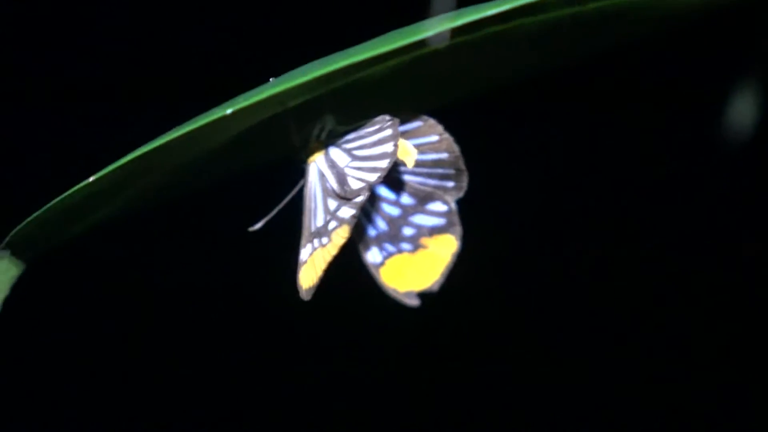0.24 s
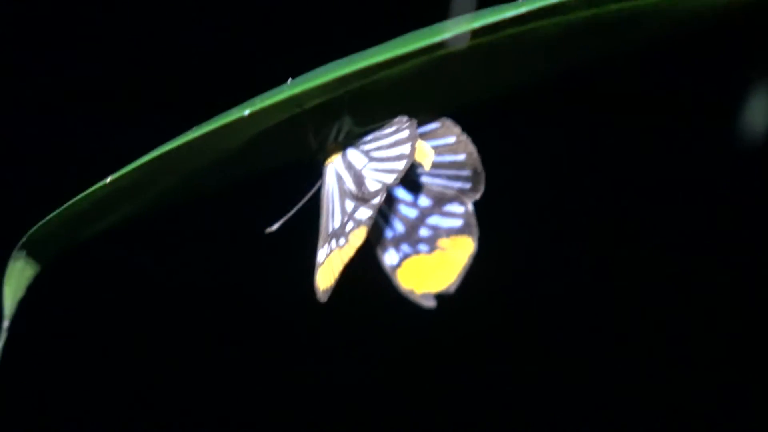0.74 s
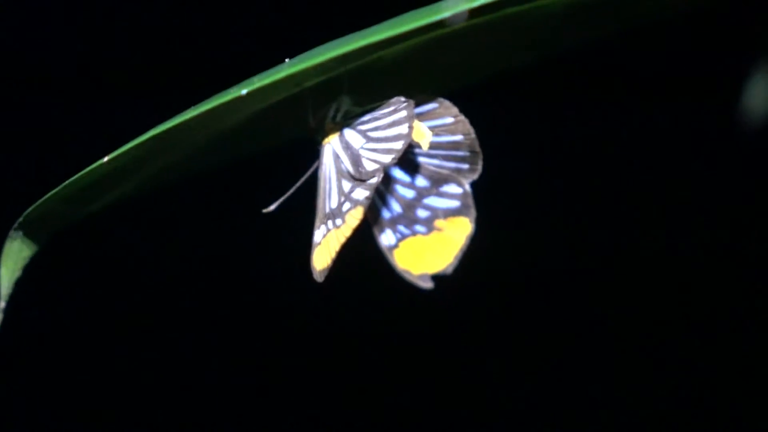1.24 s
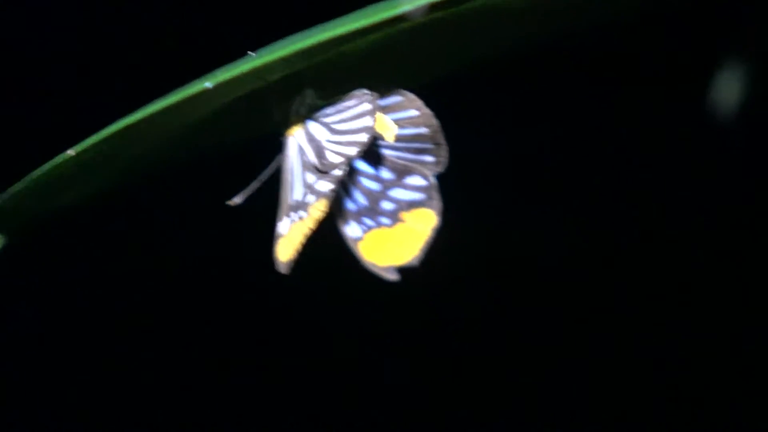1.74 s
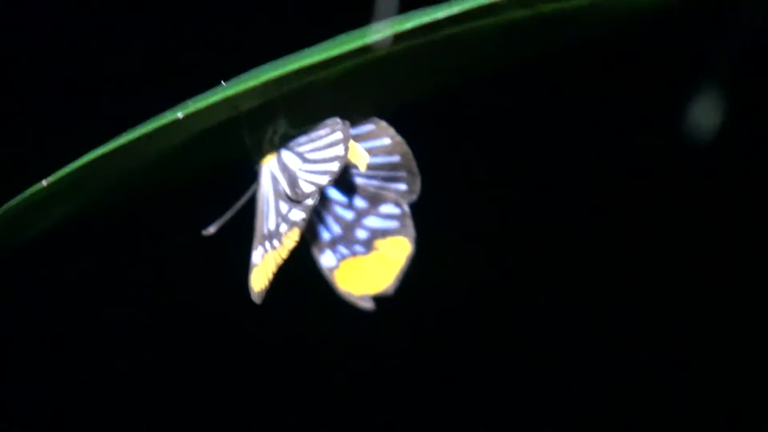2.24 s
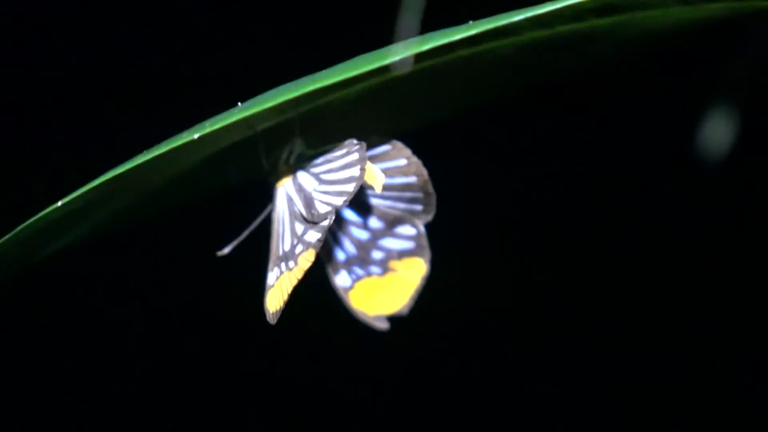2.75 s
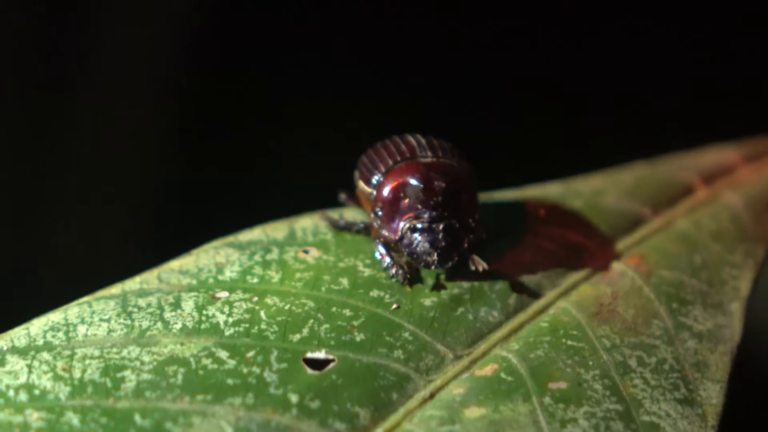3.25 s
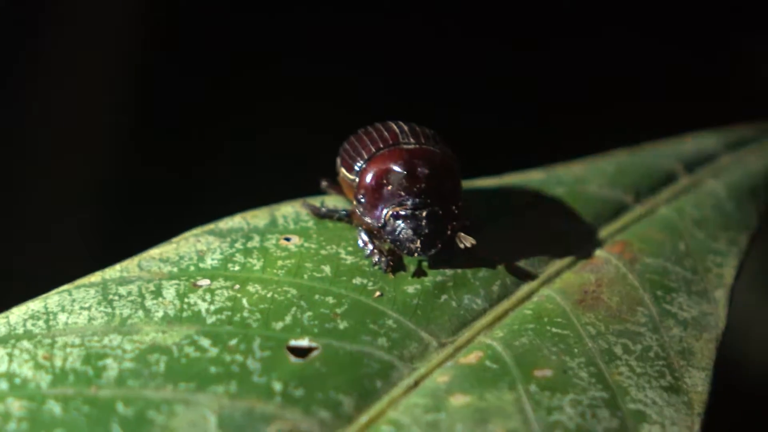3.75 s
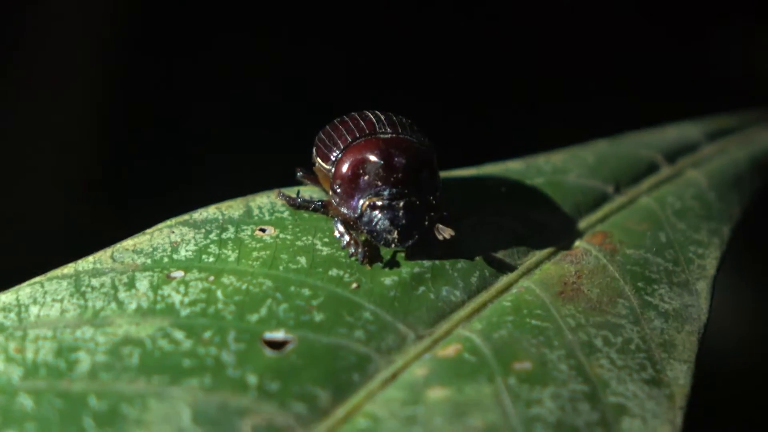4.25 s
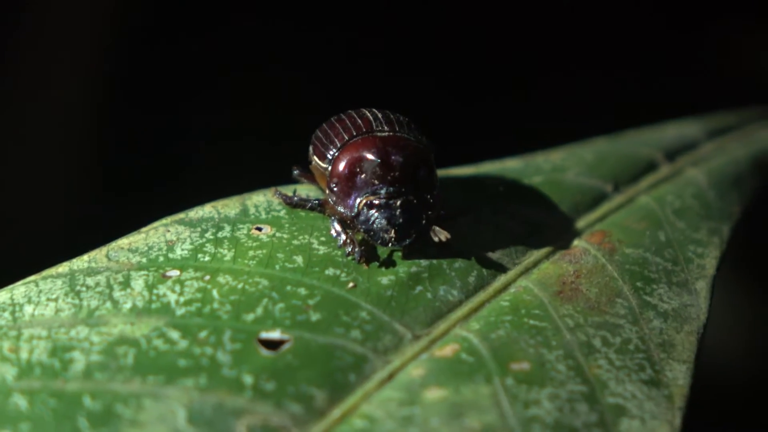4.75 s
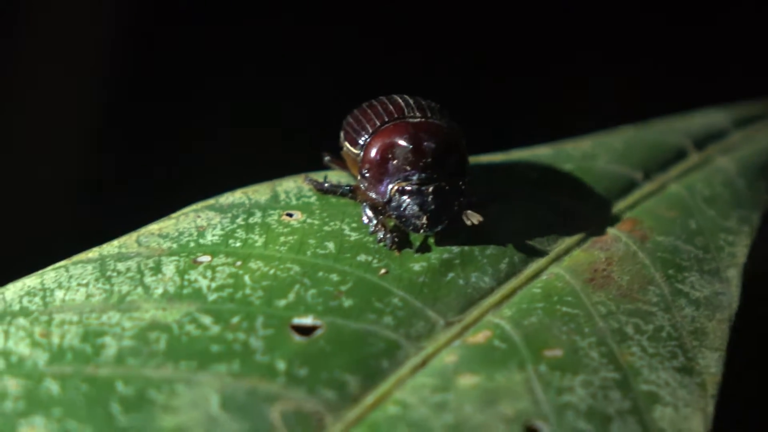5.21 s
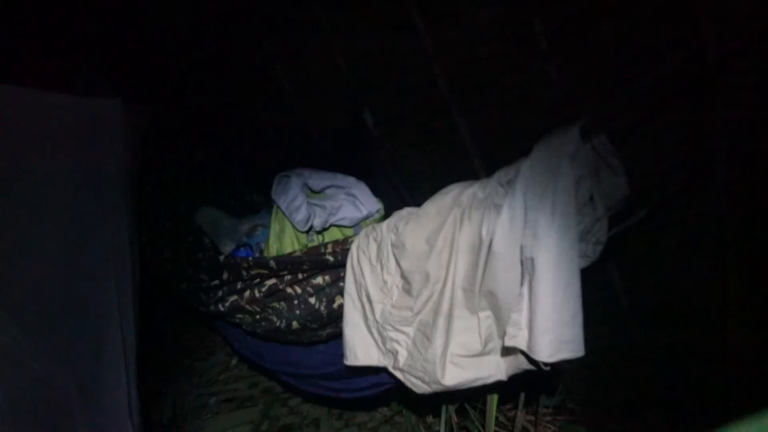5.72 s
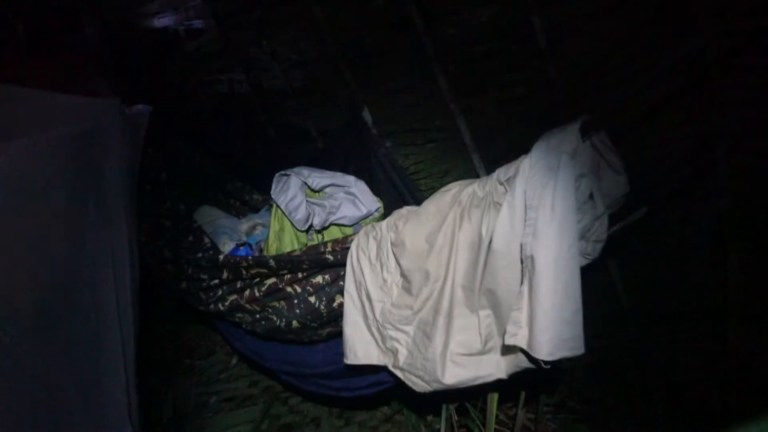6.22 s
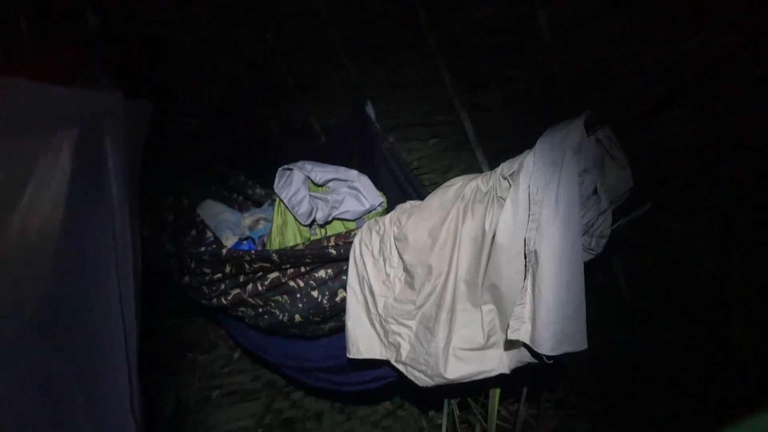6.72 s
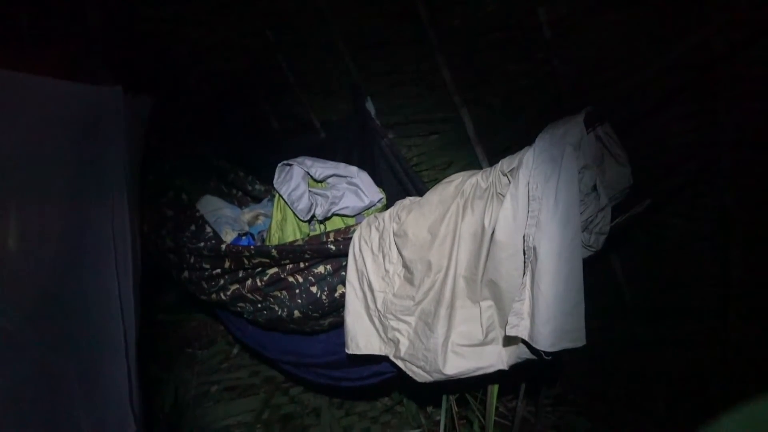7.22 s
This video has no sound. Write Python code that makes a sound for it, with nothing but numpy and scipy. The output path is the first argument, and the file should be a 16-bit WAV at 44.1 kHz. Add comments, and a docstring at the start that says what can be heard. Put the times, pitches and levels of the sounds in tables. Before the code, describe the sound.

Distant crickets hum high and steady throughout, over the hush of a night rainforest and a light, low wind rumble on the microphone. Frogs call with an echo off the trees: short peeps are scattered all along, and brief rising whoops stand out at about 1.5, 1.8, 3.4 and 6.9 seconds. Rows of falling notes come at 0.3 to 0.8 seconds, then faster at 3.5 to 4 and 6.3 to 6.8. Faint piping comes and goes. Very high katydid trills recur, more often in the second half, and a bush-cricket on the left chirps in an even, growing row from 1.8 to 4 seconds. Soft, dull knocks sound near the microphone between 3.5 and 4.1 seconds and again at 7.2. Drips tap leaves here and there, clearer at 4.9 and 6.4 seconds, with one sharp, much louder drop at 5.8.

```python
"""Far crickets hum in a few bands over the hush of a night rainforest; a breeze rumbles on two mic ports.
Frogs toot, whoop upward with a pulsing vocal sac, slide downward, peep and croak; a soft piping comes
and goes. Katydids trill high up with quick wing strokes, and a bush-cricket chirps in a growing row.
Drips tap leaves and soft knocks sound near the mic. The trunks scatter each call back as an echo."""
import sys
import numpy as np
from scipy import signal
from scipy.fft import rfft, irfft, next_fast_len
from scipy.io import wavfile
from scipy.ndimage import map_coordinates

SR = 44100
rng = np.random.default_rng(int(sys.argv[2]) if len(sys.argv) > 2 else 0)


def wav_out(sig):
    """Save sig, one row per channel (or a flat mono array), as 16-bit PCM at SR to the path in sys.argv[1]."""
    wavfile.write(sys.argv[1], SR, np.round(np.clip(np.atleast_2d(sig).T, -1, 1) * 32767).astype(np.int16))


N = 329418

# far cricket crowds (pitch [Hz], spread [Hz], level [dB])
CRICKET_CROWDS = [(4466, 180, -45.5), (5527, 230, -31.5), (5446, 500, -43), (6240, 74, -48.5),
                  (6535, 56, -47), (7225, 240, -47), (10504, 290, -50)]
# forest hush spectrum (frequency [Hz], relative density [dB])
HUSH_SPECTRUM = [(100, 8.5), (200, 4.5), (500, -2.5), (2000, -9), (3000, -8), (4200, -8.5), (6000, -38),
                 (8000, -10), (9200, -15.5), (12000, -18), (16000, -23),]
# breeze strength (time [s], level [dB])
BREEZE_LEVELS = [(0, -30), (1.1, -35), (1.7, -30), (2.6, -31), (3.6, -26.5), (4.8, -33), (6, -30),
                 (6.7, -30.5), (7.3, -29.5)]
# wind on the ports (frequency [Hz], relative density [dB])
RUMBLE_SPECTRUM = [(20, 3), (45, 0), (87, -15.5), (200, -31.5), (500, -32.5), (900, -120)]
# faint frog toots (time [s], level [dB])
FROG_TOOTS = [(.04, -51.5), (.49, -50), (4.15, -49.5)]
# whoops (time [s], level [dB], pan [dB], right lag [ms], glide start [Hz], glide end [Hz], octave [dB])
FROG_WHOOPS = [(0.138, -53.5, 2.5, 0, 2270, 2665, 7.5), (.594, -51.5, 3, 0, 2243, 2584, 2),
               (1.026, -52.5, 1.5, 0, 2177, 2544, 6.5), (1.458, -27.5, 14, .385, 2190, 2828, 1.5),
               (1.763, -31, 3, -.16, 2225, 2594, 8), (2.601, -55.5, 3, 0, 2155, 2466, 3),
               (3.398, -22.5, 3, .227, 2327, 2780, 1.5), (3.617, -40, 7, .227, 2228, 2600, 2),
               (4.27, -54, 1, 0, 2220, 2616, 9.5), (5.489, -48, 3, 0, 2230, 2625, 6),
               (6.165, -52, -1, 0, 2225, 2620, 8.5), (6.883, -31.5, 5, .204, 2183, 2650, 7.5),
               (7.222, -46.5, 5, 0, 2276, 2660, 5)]
# whooping throat's response (frequency [Hz], gain [dB])
THROAT_RESPONSE = [(2000, 4), (2400, 9), (3000, 3), (4100, 3), (4700, 8.5), (5400, 9.5), (6500, -11),
                   (7800, -7), (9000, -23), (12500, -22)]
# trills (last stroke [s], level [dB], pan [dB])
KATYDID_TRILLS = [(.47, -43, 7), (1.269, -38.5, 10), (2.04, -48.5, 30), (2.842, -52.5, 30),
                  (3.624, -41, 18), (4.412, -41, 16.5), (4.85, -42, 3.5), (5.178, -42, 20.5),
                  (5.61, -43, -1.5), (5.97, -39, 17), (6.384, -38.5, -0.5), (6.736, -39.5, 15),
                  (7.12, -37, -3), (7.5, -40, 21)]
# rows of slides (first [s], last [s], gap [s], start [Hz], end [Hz], level [dB], fade [dB], echo [dB])
SLIDE_ROWS = [(0.327, 0.754, .144, 4150, 3858, -26, -1, 2.5),
              (3.521, 4.048, 0.072, 4140, 3750, -28.5, -1.5, 4),
              (6.303, 6.795, .05, 4040, 3743, -31, -5, 5)]
# piped notes (time [s], length [s], level [dB], pitch [Hz])
PIPED_NOTES = [(0.362, 0.2, -40, 3208), (1.647, 0.12, -44.5, 3325), (2.413, 0.21, -48, 3410),
               (4.007, 0.29, -46, 3351), (4.501, 0.013, -35, 2410), (4.732, 0.02, -41, 1634),
               (5.04, 0.12, -48.5, 3400), (7.205, 0.2, -50, 3420)]
# drips on leaves (time [s], level [dB], crackle [dB], leaf pitch [Hz])
LEAF_DRIPS = [(.5317, -31, -8, 3400), (0.819, -35, -2, 1300), (.834, -28.5, 1, 1860),
              (1.081, -27, -6, 2230), (2.074, -28.5, -0.5, 2210), (3.6789, -27.5, -3, 800),
              (4.908, -16.5, 1, 2960), (5.8243, 2.5, -12, 4100), (6.148, -27, -3.5, 1840),
              (6.355, -17, 1.5, 4130), (6.7524, -23, -4, 8990)]
# peeps (time [s], level [dB], pitch [Hz], pan [dB])
FROG_PEEPS = [(1.375, -34, 4300, -2), (2.126, -28, 4585, 3), (2.292, -33.5, 4455, -0.5),
              (2.522, -29.5, 4554, 7), (2.645, -30, 3427, 13), (2.925, -31.5, 4357, 9),
              (3.184, -23.5, 4390, 8), (3.223, -20.5, 4330, 8), (3.91, -32, 4555, 11.5),
              (3.988, -23.5, 4590, 9), (5.148, -34.5, 4300, -10), (5.23, -27, 4780, 11),
              (5.851, -26.5, 3426, -2), (5.963, -31.5, 4456, 5), (6.309, -24, 4540, 10),
              (7.0, -17.5, 4364, 1), (7.382, -25.5, 4370, -8)]
# far croaks (time [s], level before echo gain [dB])
FROG_CROAKS = [(1.387, -78), (1.955, -75), (5.32, -72)]
# knocks near the mic (time [s], level [dB], pan [dB], pitch [Hz])
SOFT_KNOCKS = [(1.734, -36, 11, 312), (3.473, -25.5, -23, 302), (3.676, -24.5, 3, 195),
               (3.947, -20, -2, 575), (3.969, -19.5, -2.5, 430), (4.08, -24, -2, 364),
               (4.908, -27.5, 5, 400), (7.23, -28, -24, 300), (7.249, -23.5, -22, 168)]
# bush-cricket row (first [s], last [s], gap [s])
CHIRP_ROW = (1.833, 3.988, .1347)


def amp(db):
    return 10 ** (np.asarray(db) / 20)


def unit_rms(x):
    return x / np.sqrt(np.mean(x ** 2) + 1e-20)


def clock(length_s):
    return np.arange(int(length_s * SR)) / SR


def db_at(spectrum, hz):
    knots_hz, knots_db = np.transpose(spectrum)
    return np.interp(np.log(hz + 1), np.log(knots_hz), knots_db)


def wobble(rate_hz):
    """Smooth random curve."""
    knots = rng.standard_normal(int(N * rate_hz / SR) + 4)
    return map_coordinates(knots, [np.arange(N) * rate_hz / SR])


def lowpass(x, hz):
    return signal.sosfilt(signal.butter(2, min(hz, 20000), fs=SR, output="sos"), x)


def filtered(x, response):
    size = next_fast_len(N + 8192)
    return irfft(rfft(x, size) * response(np.fft.rfftfreq(size, 1 / SR)), size)[..., :N]


def stereo_noise(spectrum):
    return unit_rms(filtered(rng.standard_normal((2, N)), lambda hz: amp(db_at(spectrum, hz))))


def swell(t, rise_s):
    """Note envelope: quick rise, rounded end."""
    return (1 - np.exp(-t / rise_s)) * np.sqrt(np.clip(1 - (t / t[-1]) ** 2, 0, 1))


def rough_phase(t, hz, jitter, band_hz):
    """Phase of a tone with unsteady pitch."""
    return np.cumsum(2 * np.pi * hz / SR + lowpass(rng.normal(0, jitter, len(t)), band_hz))


def distance_echo_db(db, even_db):
    """Echo gain: a fainter caller is farther off, so more of it arrives as echo."""
    return 0.53 * (even_db - db)


def place(out, start_s, wave, db, pan_db, echo_db, tail_s, lag_ms=0):
    """Add a sound and its echo off the trunks. Positive pan is left; positive lag delays the right."""
    t = clock(tail_s)
    far = np.clip(echo_db / 18, 0, 1)  # far echoes gather slowly and linger
    response = rng.standard_normal((2, len(t))) * amp(-60 * t / tail_s / (1 + 0.95 * far))
    response *= 1 - np.exp(-t / (0.001 + 0.025 * far))
    response *= 1 + 0.8 * (1 - far) * np.exp(-t / 0.03)  # trunks beside a near caller
    response *= amp(echo_db + far * pan_db / 2 * np.array([[1], [-1]])) / np.linalg.norm(response[0])
    lag = round(lag_ms * SR / 1000)
    response[0, max(-lag, 0)] = (1 - far) * amp(pan_db / 2)  # direct path
    response[1, max(lag, 0)] = (1 - far) * amp(-pan_db / 2)
    heard = amp(db) * signal.fftconvolve(wave[None], response, axes=1)
    start = round(start_s * SR)
    out[:, start:start + heard.shape[1]] += heard[:, :N - start]


def crickets(out):
    """Each crowd is a hail of short wing strokes around its pitch, half drowned in its echo."""
    t = clock(0.0076)
    envelope = np.sin(np.pi * t / t[-1]) ** 2
    for hz, spread_hz, db in CRICKET_CROWDS:
        count = int(2 * spread_hz * N / SR)  # wider crowd, more singers
        near = np.zeros((2, N))
        for ear in range(2):
            stroke_hz = rng.normal(hz, spread_hz, (count, 1))
            stroke_db = 6.3 * np.clip(rng.standard_normal((count, 1)), -3, 2.2)
            strokes = amp(stroke_db) * envelope * np.sin(2 * np.pi * stroke_hz * t)
            samples = rng.integers(0, N, (count, 1)) + np.arange(len(t))
            near[ear] = np.bincount(samples.ravel(), strokes.ravel(), N + len(t))[:N]
        echo = filtered(rng.standard_normal((2, N)), lambda f: np.exp(-((f - hz) / spread_hz / 2) ** 2))
        drift_db = (.5 + 55 / spread_hz) * wobble(2.526) + 0.93 * wobble(11)  # few singers vary more
        nearness = np.clip(spread_hz / 250, 0, 1)
        crowd = unit_rms(nearness * unit_rms(near) + 1.65 * unit_rms(echo))
        out += amp(db + drift_db) * amp([[1.5], [-1.5]]) * crowd


def hush(out):
    """Broad forest noise, drifting slightly in level."""
    out += amp(-42.5 + 0.92 * wobble(2.585)) * stereo_noise(HUSH_SPECTRUM)


def breeze(out):
    """Wind buffets each port on its own, the right harder."""
    level_db = np.interp(np.arange(N) / SR, *np.transpose(BREEZE_LEVELS))
    buffets = amp(3 * np.array([wobble(7), wobble(7)]))
    out += amp(level_db) * amp([[-2.7], [2.7]]) * unit_rms(buffets * stereo_noise(RUMBLE_SPECTRUM))


def toots(out):
    """A frog holds one low, faint pitch."""
    t = clock(0.045)
    toot = np.sin(2 * np.pi * 1170 * t) * swell(t, 0.0054)
    for start_s, db in FROG_TOOTS:
        place(out, start_s, toot, db, pan_db=0, echo_db=1.5, tail_s=.35)


def whoops(out):
    """Hoarse upward sweeps. The vocal sac pulses: pitch climbs in steps, overtones beat."""
    t = clock(.042)
    envelope = swell(t, 0.0016)
    throb = np.cos(2 * np.pi * 62 * (t - .008))
    flick_hz = 138 * np.exp(-t / 0.0027)
    leaf_echo_db = 9  # leaves return overtones more than the fundamental
    for start_s, db, pan_db, lag_ms, start_hz, end_hz, octave_db in FROG_WHOOPS:
        hz = start_hz + (end_hz - start_hz) * t / t[-1] + 45 * throb - flick_hz
        phase = rough_phase(t, hz, jitter=0.055, band_hz=350)
        partials = []
        for k in range(1, 6):
            gain_db = db_at(THROAT_RESPONSE, k * hz) + octave_db * (k == 2)
            partials.append(amp(gain_db) * np.sin(k * phase) * envelope)
        overtones = sum(partials[1:]) * (1 + 0.34 * throb)
        echo_db = distance_echo_db(db, even_db=-40.5)
        place(out, start_s, partials[0], db, pan_db, echo_db, tail_s=.65, lag_ms=lag_ms)
        place(out, start_s, overtones, db, pan_db, echo_db + leaf_echo_db, tail_s=.65, lag_ms=lag_ms)


def katydids(out):
    """Short trills of wing strokes, the first strokes weaker."""
    t = clock(0.014)
    stroke = np.sin(2 * np.pi * 10670 * t) * np.sin(np.pi * t / t[-1]) ** 2.1
    count, gap_s, jitter_samples = 14, .0196, 30
    onsets = (np.arange(count) * gap_s * SR).astype(int)
    ramp_db = -5.4 * np.exp(-np.arange(count) / 3)
    for last_s, db, pan_db in KATYDID_TRILLS:
        beats = np.zeros(onsets[-1] + jitter_samples)
        beats[onsets + rng.integers(0, jitter_samples, count)] = amp(rng.normal(ramp_db, 0.44))
        trill = signal.fftconvolve(beats, stroke)
        start_s = last_s - onsets[-1] / SR - .003
        place(out, start_s, trill, db, pan_db, echo_db=-5.5, tail_s=0.16, lag_ms=.09 * pan_db)


def slides(out):
    """Frogs sing fading rows of falling notes; quick rows are less even."""
    t = clock(0.0564)
    for first_s, last_s, gap_s, start_hz, end_hz, db, fade_db, echo_db in SLIDE_ROWS:
        hz = np.linspace(start_hz, end_hz, len(t))
        slide = np.sin(2 * np.pi * np.cumsum(hz) / SR) * swell(t, 0.0032)
        for progress in np.linspace(0, 1, round((last_s - first_s) / gap_s) + 1):
            start_s = first_s + progress * (last_s - first_s) + rng.normal(0, .0005 / gap_s)
            note_db = db + fade_db * progress + rng.normal(0, 1.5)
            place(out, start_s, slide, note_db, pan_db=2, echo_db=echo_db, tail_s=.9)


def piping(out):
    """Soft frog notes, unsteady in pitch, so their echo flutters."""
    for start_s, length_s, db, hz in PIPED_NOTES:
        t = clock(length_s)
        note = np.sin(rough_phase(t, hz, jitter=.05, band_hz=90)) * swell(t, .006)
        place(out, start_s, note, db, pan_db=4, echo_db=3, tail_s=.55)


def drips(out):
    """One sharp swing of the leaf and a brief splash; a small leaf radiates no bass."""
    t = clock(.02)
    for start_s, db, crackle_db, hz in LEAF_DRIPS:
        swing = -np.sin(2 * np.pi * hz * t) * np.exp(-((t * hz - .68) / 0.5) ** 2)
        splash = 0.51 * np.diff(rng.standard_normal(len(t) + 1)) * amp(-60 * t / 0.013)
        tap = lowpass(swing + lowpass(splash, 1.35 * hz), 3.1 * hz)
        bass_cut = signal.butter(4, .33 * hz, "high", fs=SR, output="sos")
        place(out, start_s, signal.sosfilt(bass_cut, tap), db, pan_db=0, echo_db=crackle_db, tail_s=0.19)


def peeps(out):
    """Nearly pure frog notes on one pitch; the high ones are shorter."""
    for start_s, db, hz, pan_db in FROG_PEEPS:
        t = clock(0.028 if hz > 4000 else 0.048)
        peep = np.sin(rough_phase(t, hz, jitter=0.027, band_hz=220)) * swell(t, 0.0023)
        place(out, start_s, peep, db, pan_db, distance_echo_db(db, even_db=-22.5), tail_s=0.94)


def croaks(out):
    """Falling calls of far frogs, heard only as echo."""
    t = clock(0.0357)
    hz = np.linspace(3630, 3410, len(t))
    croak = np.sin(2 * np.pi * np.cumsum(hz) / SR) * swell(t, 0.0017)
    for start_s, db in FROG_CROAKS:
        place(out, start_s, croak, db, pan_db=0, echo_db=36, tail_s=.8)


def knocks(out):
    """A dull ring inside a rustle, with a soft attack."""
    t = clock(.09)
    for start_s, db, pan_db, hz in SOFT_KNOCKS:
        ring = np.sin(2 * np.pi * hz * t) * amp(-60 * t / 0.055)
        grit = rng.standard_normal(len(t))
        rustle = 0.89 * (lowpass(grit, 1.52 * hz) - lowpass(grit, 0.23 * hz)) * amp(-60 * t / 0.31)
        knock = (ring + rustle) * (1 - np.exp(-t / 0.0068))
        place(out, start_s, knock, db, pan_db, echo_db=-5, tail_s=0.23)


def bush_cricket(out):
    """An even row of slightly falling chirps on the left, growing louder."""
    t = clock(0.015)
    hz = np.linspace(8050, 7900, len(t))
    first_s, last_s, gap_s = CHIRP_ROW
    for progress in np.linspace(0, 1, round((last_s - first_s) / gap_s) + 1):
        chirp = np.sin(rough_phase(t, hz, jitter=0.16, band_hz=500)) * swell(t, 0.0012)
        start_s = first_s + progress * (last_s - first_s)
        place(out, start_s, chirp, db=-47.5 + 7.7 * progress, pan_db=25, echo_db=7, tail_s=0.3)


def scene():
    out = np.zeros((2, N))
    for source in (crickets, hush, breeze, toots, whoops, katydids, slides, piping, drips, peeps,
                   croaks, knocks, bush_cricket):
        source(out)
    return out


def record(dry):
    """The recorder keeps nothing above its band limit."""
    return filtered(dry, lambda hz: hz < 15800)


dry = scene()
out = record(dry)
wav_out(out)
```